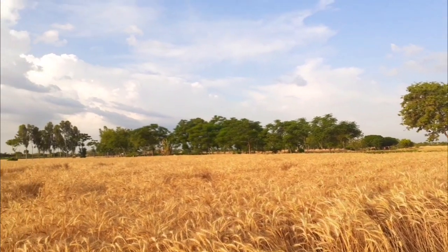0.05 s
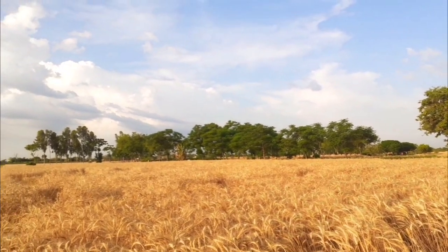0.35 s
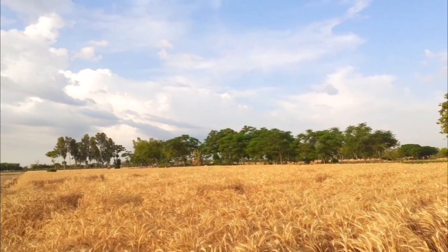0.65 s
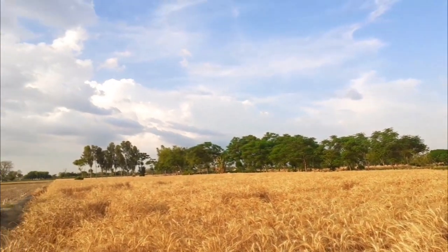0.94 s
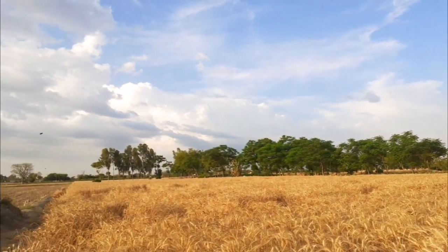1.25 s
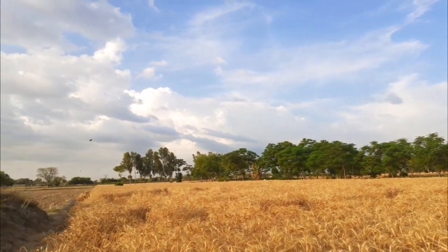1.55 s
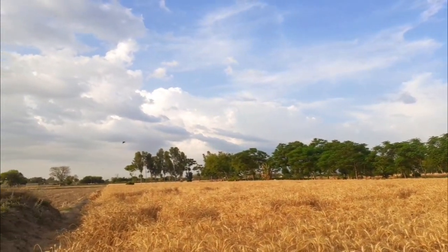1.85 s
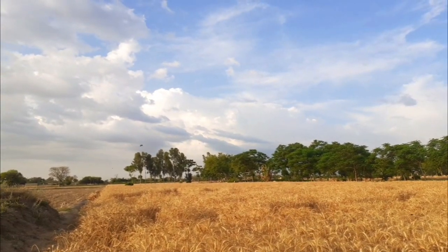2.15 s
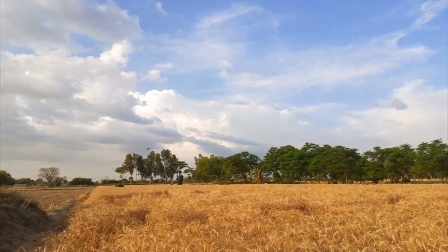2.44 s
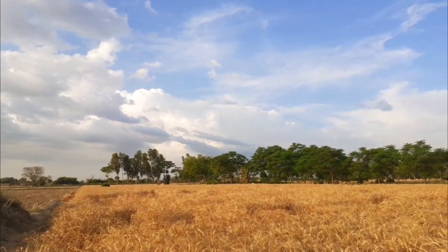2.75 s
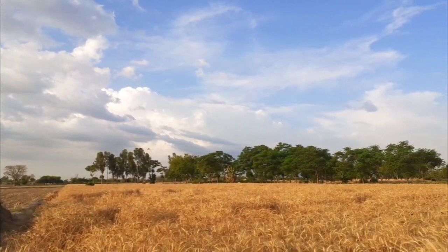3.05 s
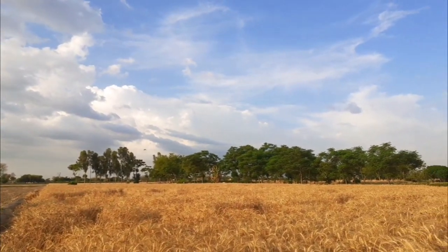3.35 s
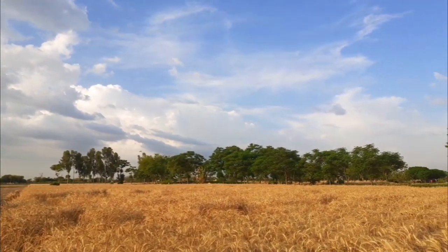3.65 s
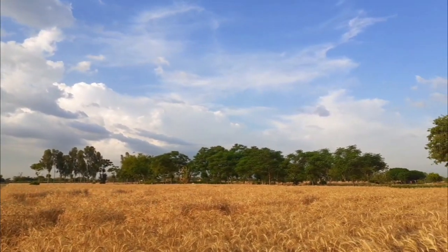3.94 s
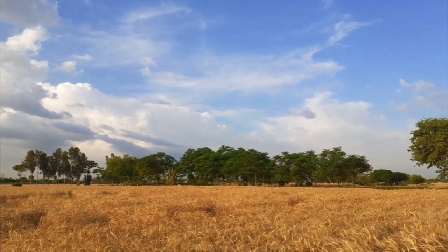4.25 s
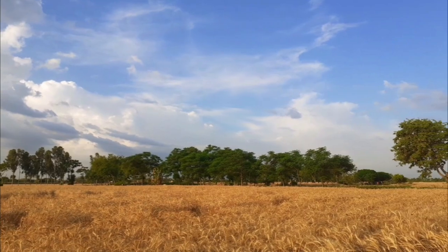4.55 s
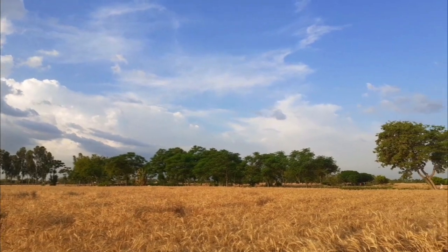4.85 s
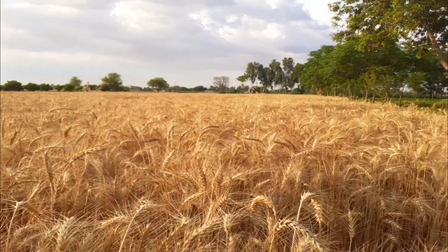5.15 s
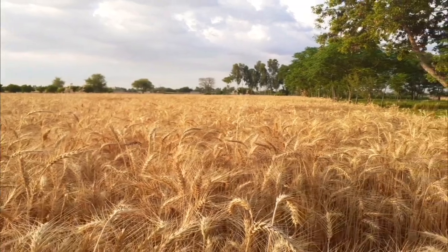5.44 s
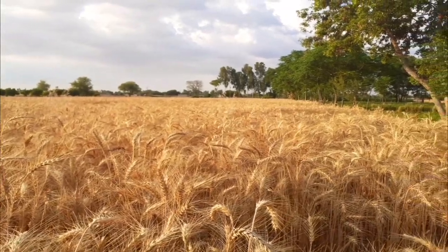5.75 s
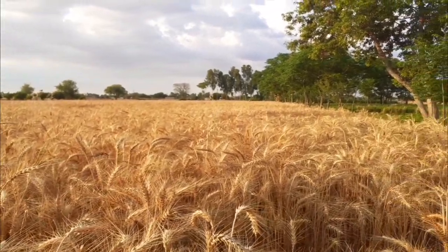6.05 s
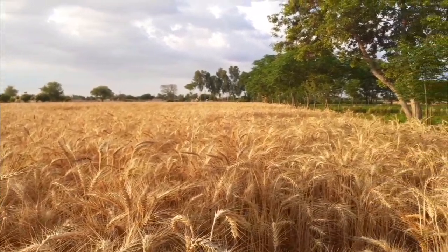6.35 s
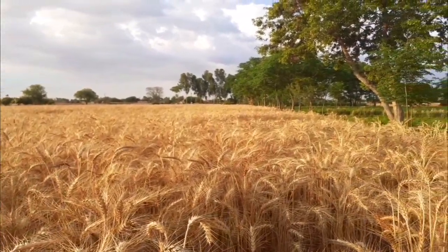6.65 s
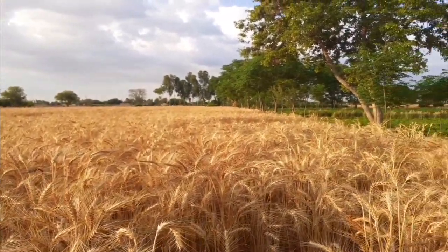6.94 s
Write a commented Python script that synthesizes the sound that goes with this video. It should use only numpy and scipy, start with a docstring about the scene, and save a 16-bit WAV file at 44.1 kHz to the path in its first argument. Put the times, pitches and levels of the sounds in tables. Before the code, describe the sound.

In open farmland a dove coos close by in the centre, in long and short low notes, while small birds chirp brightly and distant crows caw to the right. After about three seconds the dove stops and the faint background hush drops. Sparser chirps continue, with three faint nasal calls, one soft knock and two thin whistles. Near the end a gust thumps the microphone, first on the right, then on the left.

```python
"""Wheat field by a line of trees

A dove coos close by, its voice swelling through its throat resonances. Far crows caw in rasping pulses,
small birds chirp in gliding tones, and another bird gives shaky nasal calls and two whistles; the trees
scatter them all. The background hush drops after three seconds. Later come one soft knock and a gust
that buffets first the right microphone port, then the left."""
import sys
import numpy as np
from scipy import signal
from scipy.fft import rfft, irfft
from scipy.io import wavfile

SR = 44100
rng = np.random.default_rng(int(sys.argv[2]) if len(sys.argv) > 2 else 0)


def put_to_file(sound):
    """Save the sound as 16-bit audio at rate SR, in the file named by the first command-line argument."""
    columns = np.atleast_2d(sound).T  # one column per channel
    safe = np.clip(columns, -1, 1)
    whole_steps = np.round(safe * 32767)
    wavfile.write(sys.argv[1], SR, whole_steps.astype(np.int16))


N = 312669
TIME = np.arange(N) / SR


def from_db(db):
    """Decibels to gain."""
    return 10 ** (np.asarray(db) / 20)


def rms_one(x):
    """Scale to rms 1."""
    return x / np.sqrt(np.mean(x ** 2) + 1e-20)


def along(rows, at):
    """Read breakpoint curves: the first column is the axis, each other column a curve."""
    axis, *columns = np.transpose(rows)
    return [np.interp(at, axis, column) for column in columns]


def band(x, low_hz, high_hz, order=2):
    """Butterworth band-pass."""
    sos = signal.butter(order, [low_hz, min(high_hz, .49 * SR)], "band", fs=SR, output="sos")
    return signal.sosfilt(sos, x)


def drift(size, rate_hz):
    """Smooth random modulation with a spread of about 1."""
    knots = rng.standard_normal(4096)
    return np.interp(np.arange(size) * rate_hz / SR, np.arange(len(knots)), knots)


def phase_of(hz):
    """Running phase of a pitch curve."""
    return 2 * np.pi * np.cumsum(hz) / SR


def add(out, start, sound):
    """Mix a sound in at a start time, with tiny fades at its ends."""
    at = max(round(start * SR), 0)
    fades = signal.windows.tukey(len(sound), min(1, 128 / len(sound)))
    sound = (sound * fades)[:max(N - at, 0)]
    out[at:at + len(sound)] += sound


def pan(x, pan_db):
    """Positive is left, negative is right; the louder side keeps the full level."""
    return x * from_db([[min(pan_db, 0)], [min(-pan_db, 0)]])


def trees(x, wet_db, t60, delay_s):
    """Trunks and leaves scatter sound back: many weak echoes, different on each side."""
    t = np.arange(SR) / SR
    echoes = rng.standard_normal((2, SR)) * (rng.random((2, SR)) < 900 / SR)
    echoes *= from_db(-60 * t / t60) * (t > delay_s)
    echoes /= np.sqrt(np.sum(echoes ** 2, axis=1, keepdims=True)) + 1e-12
    return x + from_db(wet_db) * signal.fftconvolve(np.atleast_2d(x), echoes, axes=1)[:, :N]


# EQ curves of the background bed, before and after it drops: f/Hz, relative level/dB
EARLY_HUSH_EQ = [(25, -13.5), (60, -0.5), (120, -2.5), (250, -6), (500, -10.5), (1000, -16), (2000, -20),
                 (3500, -21), (6000, -26), (8000, -26), (15000, -28)]
LATE_HUSH_EQ = [(25, -19), (60, 3.5), (120, 1), (250, -13), (340, -12.5), (480, -21.5), (1000, -26),
                (2000, -28.5), (3500, -30), (5000, -33), (7200, -25.5), (8500, -32.5), (15000, -32.5)]


def hush(eq, level_db, bass_pan_db):
    """Distant air and microphone hiss, unrelated on the two sides; the bass flutters in the breeze."""
    hz = np.maximum(np.fft.rfftfreq(N, 1 / SR), 1)
    eq_hz, eq_db = np.transpose(eq)
    low_cut = hz ** 2 / (hz ** 2 + 30 ** 2)
    gain = from_db(np.interp(np.log(hz), np.log(eq_hz), eq_db)) * low_cut
    noise = rms_one(irfft(rfft(rng.standard_normal((2, N))) * gain, N))
    bass = irfft(rfft(noise) / (1 + (hz / 250) ** 4), N)
    flutter = from_db(2.5 * drift(N, 18))
    return from_db(level_db) * (noise - bass + pan(bass, bass_pan_db) * flutter)


CREAK_BELOW_HZ = 440


def coo(start, rise, hold, fall, top_hz, sagged_hz, rest_hz=356, break_s=.0057, attack_s=.033):
    """Pitch and breath pressure of one coo, as the voice breaks between two registers."""
    peak = start + rise
    drop = peak + hold
    end = drop + fall
    hz, = along([(start, rest_hz), (start + .29 * rise, 440.5),  # climbs
                 (peak - break_s, min(552, top_hz)), (peak, top_hz),  # breaks upward
                 (peak + hold / 2, top_hz - .263 * (top_hz - sagged_hz)), (drop, sagged_hz),  # sags
                 (drop + min(break_s, .4 * fall), min(464.5, sagged_hz)),  # breaks back down
                 (drop + .7 * fall, CREAK_BELOW_HZ), (end, rest_hz)], TIME)  # trails off
    pressure = np.interp(TIME, [start, start + attack_s, drop, end - break_s, end], [0, 1, 1, .5, 0])
    sounding = (TIME >= start) & (TIME < end)
    return hz[sounding], pressure[sounding]


# coo cues: t/s, rise/s, hold/s, fall/s, top f/Hz, f at the end of the hold/Hz
COOS = [(-0.242, .16, 0.35, 0.19, 592.5, 531), (.688, .0714, .0363, .06, 552.2, 529),
        (1.716, 0.092, 0.064, 0.013, 651, 591), (1.945, .1015, .347, .186, 597.5, 531.3),
        (2.836, 0.0474, 0.015, 0.0529, 465, 456)]
# faint overtones of the voice: harmonic number, level/dB
DOVE_OVERTONES = [(2, -63), (3, -72.5), (4, -72), (5, -67.5), (6, -71.5), (9, -79.5)]
# resonances of the inflated throat: f/Hz, width/Hz, level/dB
DOVE_THROAT = [(489.3, 32.7, -20), (618, 74, -28.5)]


def dove(octave_lift_db=6.5, waver=.0048, creak=.4, creak_hz=84):
    """A steady voice swells as its pitch crosses the throat resonances; weak overtones leak past."""
    voice, out = np.zeros(N), np.zeros(N)
    for start, *contour in COOS:
        hz, pressure = coo(start, *contour)
        size = len(hz)
        phase = phase_of(hz * (1 + waver * drift(size, 120)))
        slack = np.clip((CREAK_BELOW_HZ - hz) / 60 + .5, 0, 1)  # at low pitch the voice creaks
        rattle = np.sin(phase_of(creak_hz * (1 + .52 * drift(size, 60))))
        envelope = np.sqrt(2) * pressure * (1 + creak * slack * rattle)
        add(voice, start, envelope * np.sin(phase))
        lift_db = octave_lift_db * np.clip((520 - hz) / 50, 0, 1)  # the low register favours the octave
        for k, db in DOVE_OVERTONES:
            overtone_db = db + (lift_db if k == 2 else -lift_db / 2) + 2.5 * drift(size, 25)
            add(out, start, envelope * from_db(overtone_db) * np.sin(k * phase))
    for k, (hz, width, db) in enumerate(DOVE_THROAT):
        resonance = signal.lfilter(*signal.iirpeak(hz, hz / width, fs=SR), voice + 1e-18)
        out += (-1) ** k * from_db(db) * resonance
    return out


def songbird(notes, gesture, level_db, trill_hz, waver, rough, onset_s=.0043):
    """Each note is one gliding tone that follows a gesture; roughness spreads it into sidebands."""
    out = np.zeros(N)
    for start, length, top_hz, db in notes:
        size = int(length * SR)
        pitch_ratio, shape_db, trill_depth = along(gesture, np.linspace(0, 1, size))
        trill = trill_depth * np.sin(phase_of(trill_hz * (1 + .065 * drift(size, 90))))
        hz = top_hz * pitch_ratio * (1 + trill + waver * drift(size, 600))
        attack = 1 - np.exp(-(np.arange(size) / SR / onset_s) ** 2)  # the vibration takes time to grow
        envelope = attack * from_db(db + level_db + shape_db + 2.9 * drift(size, 220))
        grain = 1 + rough * drift(size, top_hz / 3)
        add(out, start, np.sqrt(2) * envelope * grain * np.sin(phase_of(hz)))
    return out


# an opening run of upswept notes: t/s, length/s, level/dB
UPSWEEPS = [(0.04, 0.1, -40), (0.213, 0.11, -42), (0.398, 0.088, -42), (0.551, 0.08, -42.5),
            (0.706, 0.087, -43.5)]
# two-note chirps, a thin tsip leading into a chip:
# chip t/s, length/s, top f/Hz, level/dB, tsip lead/s, tsip level/dB
CHIRPS = [(0.356, 0.052, 5820, -49, .038, -51), (0.59, 0.019, 7180, -40.5, 0.068, -56),
          (1.168, 0.029, 6760, -41.5, .048, -50), (1.214, 0.03, 5880, -45.5, 0.062, -48),
          (1.622, 0.029, 6460, -39.5, 0.024, -53), (2.041, 0.025, 5790, -44, 0.038, -52.5),
          (2.194, 0.035, 6730, -41, 0.064, -61.5), (2.777, 0.03, 6290, -38.5, 0.027, -52.5),
          (2.971, 0.029, 6000, -53.5, 0.044, -49), (3.897, 0.03, 6830, -41, 0.071, -52),
          (4.284, 0.04, 7130, -46, .068, -61), (4.862, 0.037, 6270, -46.5, 0.031, -53),
          (5.63, 0.036, 7210, -49.5, 0.071, -57), (6.133, 0.024, 5600, -53.5, 0.049, -64),
          (6.594, 0.036, 6490, -44, 0.027, -55), (7.057, 0.044, 6800, -54, .04, -62)]
# single tsips and buzzy rising notes: t/s, length/s, top f/Hz, level/dB
LONE_TSIPS = [(1.088, 0.017, 7400, -52), (1.459, 0.018, 5950, -45), (3.355, 0.059, 7600, -62.5),
              (4.0, 0.039, 6700, -58.5)]
BUZZES = [(0.605, 0.028, 6010, -45), (1.258, 0.038, 6932, -45.5), (1.533, 0.015, 5800, -37),
          (2.38, 0.028, 6960, -43)]
# note shapes: position/note length, pitch/top pitch, level/dB, trill depth/pitch
UPSWEEP_GESTURE = [(0, 0.52, -9.5, 0), (0.09, .61, -2, 0.01), (.3, .655, -9, .01), (0.549, .69, -6, .01),
                   (.7, .72, -2.5, .01), (.75, .75, -6.5, .02), (0.79, .92, -5.5, .01), (.86, 0.95, -4, 0),
                   (.95, 1, -4.5, 0), (1, 0.97, -11, 0)]
CHIP_GESTURE = [(0, 0.77, -16, 0.008), (0.2, 0.98, -7, 0.0013), (.36, 0.99, -4, 0.014),
                (.52, 0.8, -3.5, 0.016), (.68, .77, -1, .03), (.85, .7, -4, .03), (1, 0.68, -11, 0)]
TSIP_GESTURE = [(0, 0.33, -3, 0.0066), (.25, .91, -1, 0.0046), (.5, 0.95, -3.5, 0.0038), (.75, .9, -6, 0),
                (1, .66, -3, 0.0021)]
BUZZ_GESTURE = [(0, 0.44, -9.5, 0.15), (.45, 0.63, -3, 0.095), (.75, 1, 2.5, 0.087), (1, 0.64, -5.5, 0.038)]


def near_birds(upsweep_hz=7193, tsip_hz=7000, tsip_s=.029):
    """Bright upsweeps, chirps and buzzes; windpipe and beak pass only a narrow band."""
    upsweeps = [(start, length, upsweep_hz, db) for start, length, db in UPSWEEPS]
    chips = [row[:4] for row in CHIRPS]
    tsips = [(start - lead, tsip_s, tsip_hz, db) for start, *_, lead, db in CHIRPS] + list(LONE_TSIPS)
    song = songbird(upsweeps, UPSWEEP_GESTURE, level_db=-1.5, trill_hz=258.7, waver=.011, rough=.42)
    song += songbird(chips, CHIP_GESTURE, level_db=0, trill_hz=334.8, waver=.05, rough=.35, onset_s=.009)
    song += songbird(tsips, TSIP_GESTURE, level_db=2, trill_hz=300, waver=.027, rough=.4, onset_s=.013)
    song += songbird(BUZZES, BUZZ_GESTURE, level_db=0, trill_hz=240.7, waver=.018, rough=.45)
    return band(song, 4250, 7350, order=4) * from_db(-1)


def flock(gesture, low_hz, high_hz, length_s, level_db, count):
    """A bed of chatter: distant birds call at random times, pitches and strengths."""
    when, pitch, span, softness = rng.random((count, 4)).T
    starts = (np.arange(count) + when) / count * N / SR
    top_hz = low_hz * (high_hz / low_hz) ** pitch
    notes = np.column_stack([starts, length_s * (.5 + span), top_hz, -8 * softness])
    return songbird(notes, gesture, level_db, trill_hz=200, waver=.016, rough=.4)


# caw cues: t/s, length/s, throat f/Hz, level/dB
CAWS = [(0.091, 0.57, 1742, -50), (0.8, 0.46, 1750, -54), (1.358, 0.29, 1716, -53),
        (1.622, 0.36, 1760, -56), (1.977, 0.41, 1682, -56.5), (2.493, 0.32, 1818, -54.5),
        (3.159, 0.31, 1800, -54), (3.825, 0.14, 1724, -55), (4.093, 0.24, 1804, -61.5),
        (4.688, 0.37, 1750, -61), (5.268, 0.41, 1727, -59), (5.956, 0.34, 1773, -63.5),
        (6.496, 0.25, 1964, -68)]
# shape of one caw: position/call length, pulse rate/Hz, level/dB
CAW_GESTURE = [(0, 74, -13), (.2, 84, -6.5), (.5, 83, -5.5), (.8, 79, -6.5), (.93, 60, -9.5),
               (1, 89, -21.5)]
# throat resonances: f/throat f, width/Hz, level/dB
CROW_THROAT = [(0.829, 200, -5.5), (.975, 170.6, 4.5), (1.12, 300, -3.5)]


def crows(jitter=.012, rasp=.35, level_db=3.5, bend=.05, swell_db=3):
    """Slow uneven pulses, each with a puff of noise, ring the throat resonances."""
    out = np.zeros(N)
    for start, length, throat_hz, db in CAWS:
        size = int(length * SR)
        pulse_hz, shape_db = along(CAW_GESTURE, np.linspace(0, 1, size))
        cycles = np.cumsum(pulse_hz * (1 + .06 * rng.normal() + jitter * drift(size, 80))) / SR
        voice = np.zeros(size)
        for ratio, width, mode_db in CROW_THROAT:
            late = cycles - ratio * 2  # each pulse chirps: the resonances are struck at different points in the cycle
            clicks = np.diff(np.floor(late), prepend=np.floor(late[0]))
            pulses = rms_one(clicks * from_db(2 * drift(size, 80)))
            puffs = rms_one(rng.standard_normal(size) * np.exp(-(late % 1)))
            hz = throat_hz * ratio
            voice += from_db(mode_db) * band(pulses + rasp * puffs, hz - width / 2, hz + width / 2)
        # the beak opens, then closes further, and bends the whole call with it
        beak = np.sin(np.linspace(0, np.pi, size)) - np.linspace(.5, .8, size)
        voice = np.interp(np.cumsum(1 + bend * beak), np.arange(size), voice)
        add(out, start, from_db(db + level_db + shape_db + swell_db * beak) * rms_one(voice))
    return out


# falling slurs: t/s, top f/Hz, level/dB
SLURS = [(0.14, 2895, -45), (0.42, 2770, -44), (0.671, 2620, -49.5), (0.775, 2654, -50),
         (0.95, 2670, -46.5), (1.207, 2640, -48), (1.475, 2796, -45), (1.78, 2670, -46),
         (2.13, 2686, -41.5), (4.255, 2854, -59), (4.495, 1780, -62.5), (5.744, 1654, -61.5)]
# flat piping notes and softly rising peeps: t/s, length/s, top f/Hz, level/dB
PIPES = [(0.635, 0.04, 3440, -60), (0.905, 0.069, 3600, -61.5), (1.037, 0.05, 4040, -51.5),
         (1.193, 0.052, 4020, -50.5), (1.357, 0.048, 4015, -50.5), (1.477, 0.033, 6310, -42.5),
         (2.085, 0.05, 3510, -53), (2.362, 0.027, 6190, -48.5), (2.845, 0.033, 6320, -56.5),
         (5.15, 0.065, 6490, -66), (5.33, 0.056, 5670, -61.5), (6.47, 0.095, 3730, -71.5),
         (6.77, 0.045, 3860, -69)]
PEEPS = [(.863, 0.049, 4720, -55), (.946, 0.039, 4550, -53)]
# note shapes: position/note length, pitch/top pitch, level/dB, trill depth/pitch
SLUR_GESTURE = [(0, 0.87, -10.5, 0), (.15, 0.94, -5, 0), (.5, .83, -2.5, 0.0063), (1, 0.79, -4.5, 0)]
PIPE_GESTURE = [(0, .98, -9, 0), (.18, 1, 0, .005), (.8, 1, -1, .005), (1, 1, -10, 0)]
PEEP_GESTURE = [(0, 0.86, -4.5, 0), (.3, .95, 5, 0.0044), (1, 0.99, -5, 0.0083)]


def far_birds(slur_s=.062):
    """Short, grainy tones from the tree line: piping notes, peeps and falling slurs."""
    slurs = [(start, slur_s, hz, db) for start, hz, db in SLURS]
    return (songbird(PIPES, PIPE_GESTURE, level_db=-1.5, trill_hz=60, waver=.018, rough=.4)
            + songbird(PEEPS, PEEP_GESTURE, level_db=-3.5, trill_hz=60, waver=.008, rough=.3)
            + songbird(slurs, SLUR_GESTURE, level_db=-5, trill_hz=90, waver=.016, rough=.31))


# low thumps of eddies hitting the ports: t/s, peak level/dB, f/Hz, pan/dB
EDDIES = [(1.114, -36, 103, 25), (1.15, -39, 85.5, 25), (1.42, -47, 85, 5), (3.139, -43, 75, 21),
          (5.534, -16.5, 75, -44), (5.568, -13.5, 105.6, -46), (5.631, -34, 75, -30),
          (5.788, -21, 134.6, -40), (5.888, -22.5, 80, -42), (5.957, -22.5, 85.5, -31),
          (6.031, -28, 102, -34), (6.269, -31, 107, 27), (6.384, -19, 100, 37), (6.461, -22.5, 90, 25),
          (6.511, -27.5, 90, 29), (6.578, -34, 83.5, 20)]
# gust rumbles: t/s, hold/s, level/dB, pan/dB
GUSTS = [(5.518, 0.4, -36, -34.5), (6.234, 0.084, -37, 24)]


def wind(attack_s=.0088, fall_db_per_s=64, lumps_db=4, eddy_rise_s=.00947, edge_db=-20):
    """Turbulence rumbles on each microphone port; single eddies push the membrane for a cycle or two."""
    out = np.zeros((2, N))
    for start, hold, db, pan_db in GUSTS:
        turbulence = rng.standard_normal((2, N)) * from_db(lumps_db * drift(N, 45))
        rumble = rms_one(band(band(turbulence, 50, 126), 47, 280, order=4))
        attack = np.clip((TIME - start) / attack_s, 0, 1)
        fall_db = fall_db_per_s * np.maximum(TIME - start - hold, 0)
        out += pan(attack * from_db(db - fall_db) * rumble, pan_db)
    t = np.arange(int(.06 * SR)) / SR
    swell = (t / eddy_rise_s * np.exp(1 - t / eddy_rise_s)) ** 5
    for start, db, hz, pan_db in EDDIES:
        eddy = np.zeros(N)
        phase = 2 * np.pi * hz * (t - eddy_rise_s)
        edge = from_db(edge_db) * swell * np.cos(3 * phase)  # sharpens the crest
        add(eddy, start, from_db(db) * swell * (np.cos(phase) + edge))
        out += pan(eddy, pan_db)
    return band(out + 1e-18, 35, 1000)


# nasal call cues: t/s, length/s, starting f/Hz, level/dB
NASAL_CALLS = [(3.482, 0.089, 1313, -60), (3.613, .1, 1340, -59.5), (3.765, 0.2, 1349, -60)]
# their timbre, with a weak fundamental: harmonic number, level/dB
NASAL_HARMONICS = [(1, -20.5), (2, -.5), (3, -5.5), (4, -2.5), (5, -3)]


def nasal_bird(shake_hz=72, tremolo=.65, vibrato=.014, attack_s=.036, release_s=.02, sag_hz_per_s2=3400):
    """A stack of harmonics that swells, sags ever faster, and shakes quickly in level and pitch."""
    out = np.zeros(N)
    for start, length, start_hz, db in NASAL_CALLS:
        t = np.arange(0, length, 1 / SR)
        hz = start_hz - sag_hz_per_s2 * t ** 2
        envelope = np.minimum(t / attack_s, 1) * np.minimum((length - t) / release_s, 1)
        shake = phase_of(shake_hz * (1 + .12 * drift(len(t), 49.5)))
        phase = phase_of(hz * (1 + vibrato * np.cos(shake) + .0251 * drift(len(t), 904)))
        voice = sum(from_db(harmonic_db + 4.2 * drift(len(t), 64)) * np.sin(k * phase)
                    for k, harmonic_db in NASAL_HARMONICS)
        add(out, start, from_db(db) * envelope * (1 + tremolo * np.sin(shake)) * voice)
    return out


# body of the knock: f/Hz, level/dB, t60/s
KNOCK_MODES = [(129, -2.5, 0.13), (267, 5, 0.01), (416, 10.5, 0.011), (830, 3, 0.0035), (2010, 10, 0.0023)]


def knock(start_s=3.864, level_db=-39):
    """One soft, dull knock near the microphone: damped modes, the lowest ringing longest."""
    t = np.maximum(TIME - start_s, 0)
    return sum(from_db(level_db + db - 60 * np.minimum(t / t60, 3)) * np.sin(2 * np.pi * hz * t)
               for hz, db, t60 in KNOCK_MODES)


# whistle cues: t/s, length/s, top f/Hz, level/dB
WHISTLES = [(3.96, 0.115, 2824, -61.5), (4.35, 0.13, 2890, -57.5)]
# whistle shape: position/note length, pitch/top pitch, level/dB, trill depth/pitch
WHISTLE_GESTURE = [(0, .87, -10, 0.005), (.16, 0.96, -4, 0.003), (.4, 1, -2.5, 0), (.64, 0.99, -3, 0),
                   (.72, .91, -11.5, .12), (1, .86, -13, 0.13)]


def whistling_bird():
    """Two clear, arching tones, each with a trilled tail."""
    return songbird(WHISTLES, WHISTLE_GESTURE, level_db=1.5, trill_hz=75, waver=.0024, rough=.078)


def scene(drop_s=3.17):
    """Dove in the centre, other birds to the right; hush and chatter drop together."""
    early = np.clip((drop_s - TIME) / .005, 0, 1)
    whistles = whistling_bird()
    tsips = flock(TSIP_GESTURE, low_hz=5660, high_hz=7600, length_s=.035, level_db=-72, count=90)
    peeps = flock(PEEP_GESTURE, low_hz=3287, high_hz=5530, length_s=.05, level_db=-75.5, count=120)
    chatter = (tsips + peeps * early) * from_db(9 * early)
    chirps = trees(near_birds(), wet_db=-3.5, t60=.087, delay_s=.001)
    birds = pan(trees(chirps, wet_db=-11, t60=.4, delay_s=.015), pan_db=-18.5)
    birds += pan(trees(far_birds(), wet_db=-2.5, t60=.24, delay_s=.005), pan_db=-17.5)
    birds += pan(trees(chatter, wet_db=.5, t60=.18, delay_s=.002), pan_db=-11.5)
    birds += pan(trees(whistles, wet_db=-8, t60=.27, delay_s=.014), pan_db=-4)
    birds += pan(trees(nasal_bird(), wet_db=.5, t60=.17, delay_s=.002), pan_db=-6)
    birds += pan(trees(crows(), wet_db=0, t60=.13, delay_s=.0038), pan_db=-17)
    coos = trees(dove(), wet_db=-22, t60=.041, delay_s=.001)
    birds += trees(coos, wet_db=-30.5, t60=.49, delay_s=.058)
    air = early * hush(EARLY_HUSH_EQ, level_db=-55.5, bass_pan_db=-5)
    air += (1 - early) * hush(LATE_HUSH_EQ, level_db=-59.5, bass_pan_db=-6.5)
    return birds + air + wind() + pan(knock(), pan_db=-37)


def record(dry):
    """A steep high cut at 15.4 kHz."""
    return signal.sosfilt(signal.ellip(10, .1, 80, 15400, fs=SR, output="sos"), dry)


dry = scene()
out = record(dry)
put_to_file(out)
```